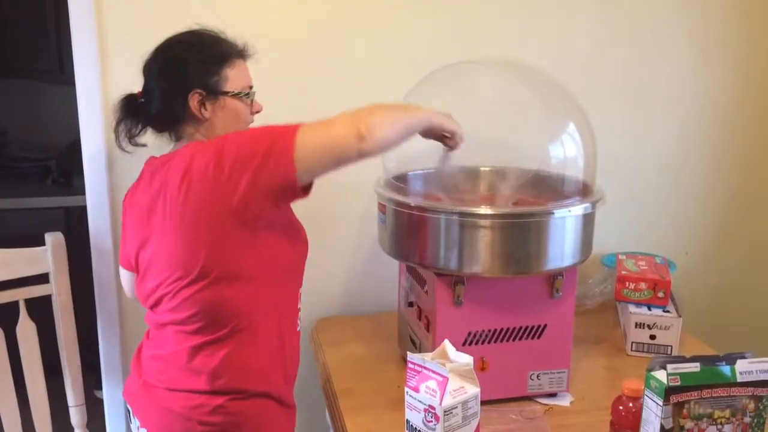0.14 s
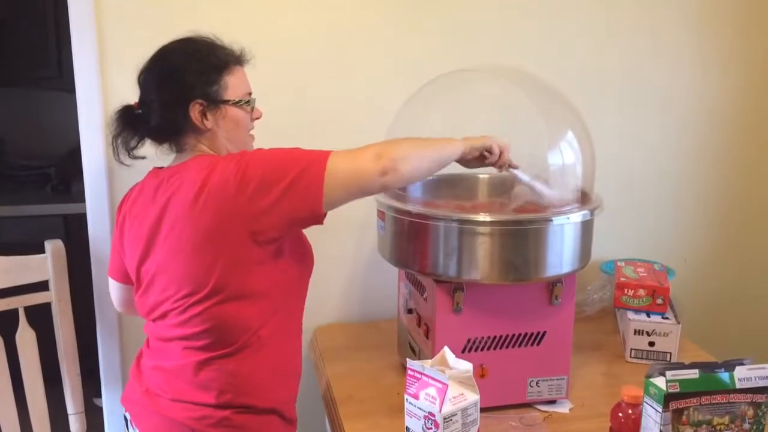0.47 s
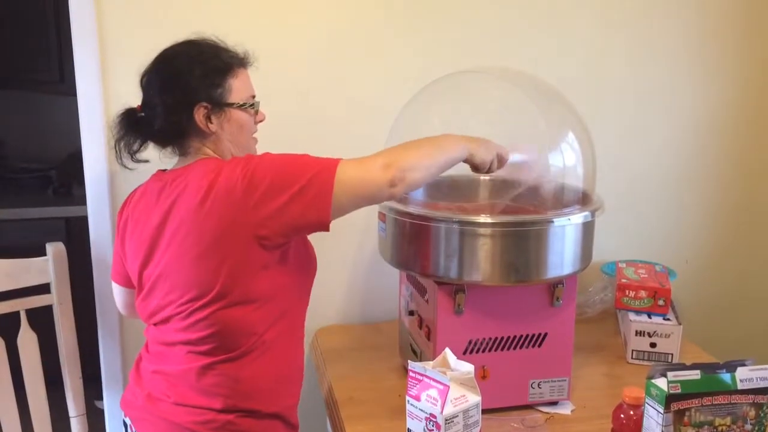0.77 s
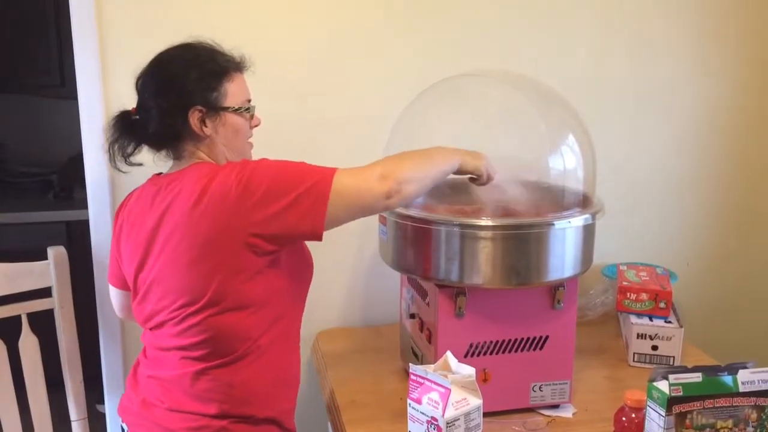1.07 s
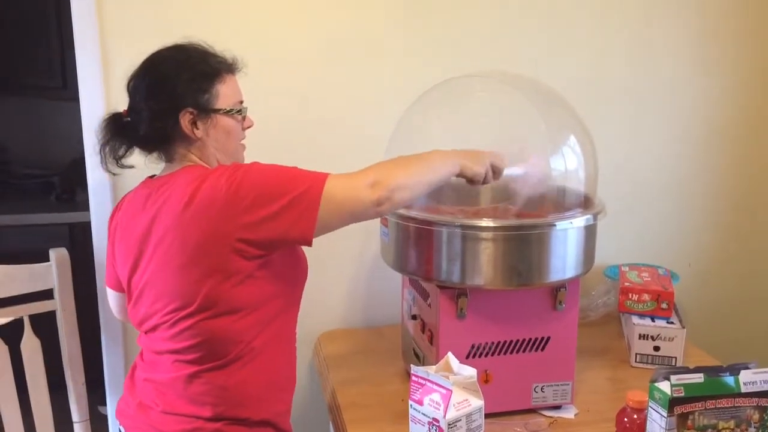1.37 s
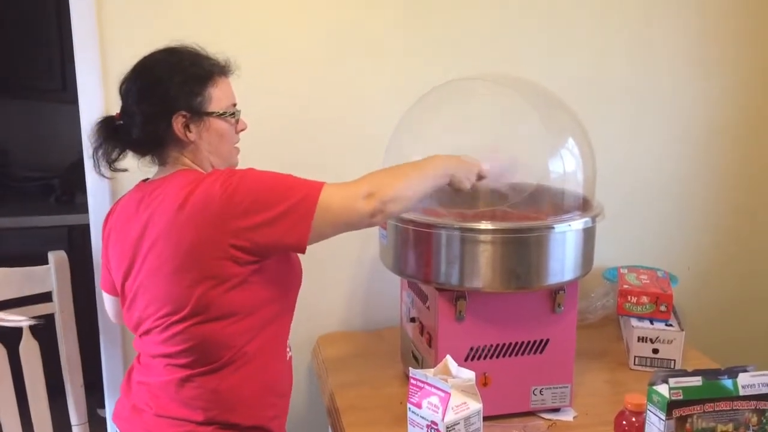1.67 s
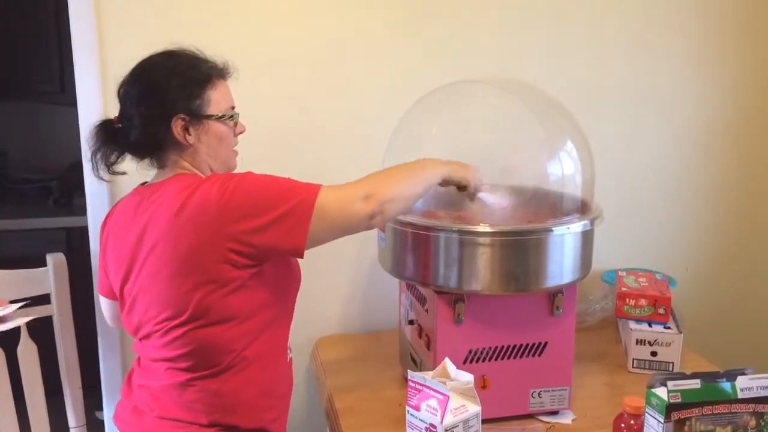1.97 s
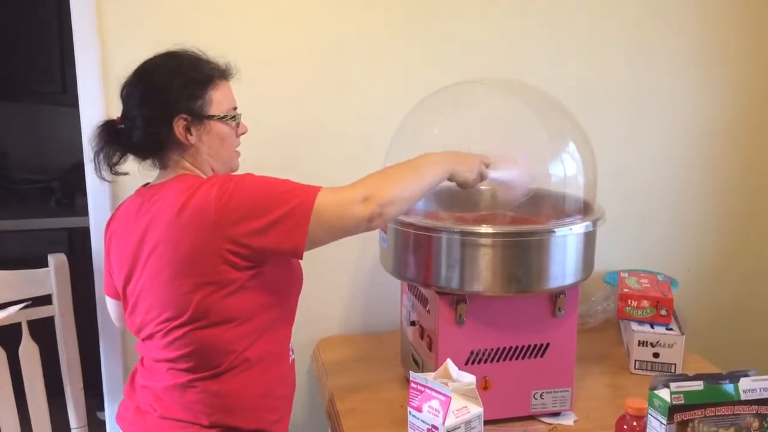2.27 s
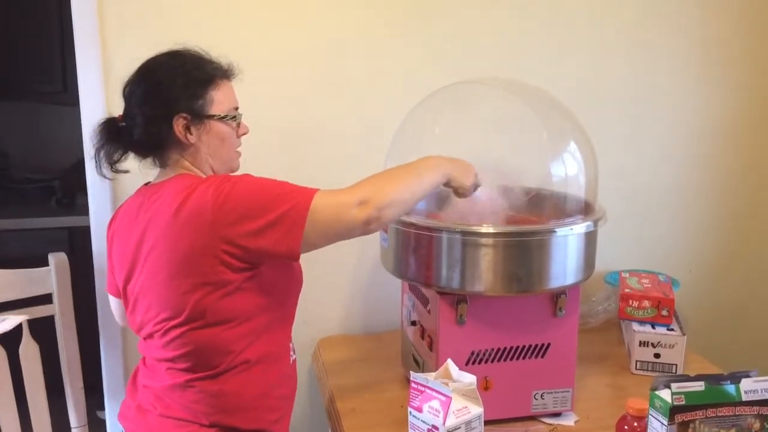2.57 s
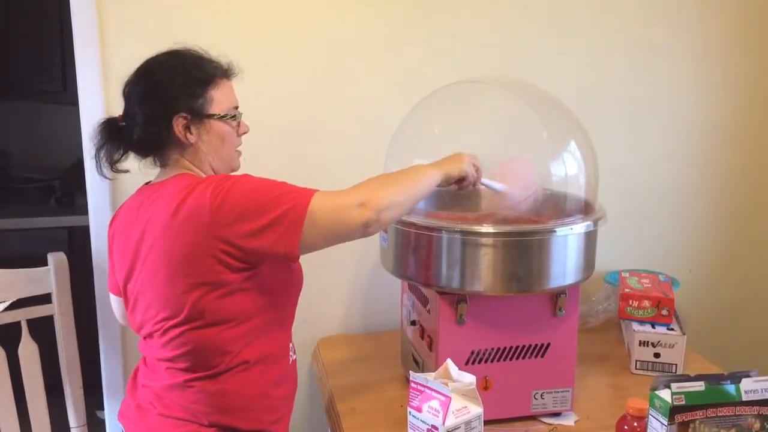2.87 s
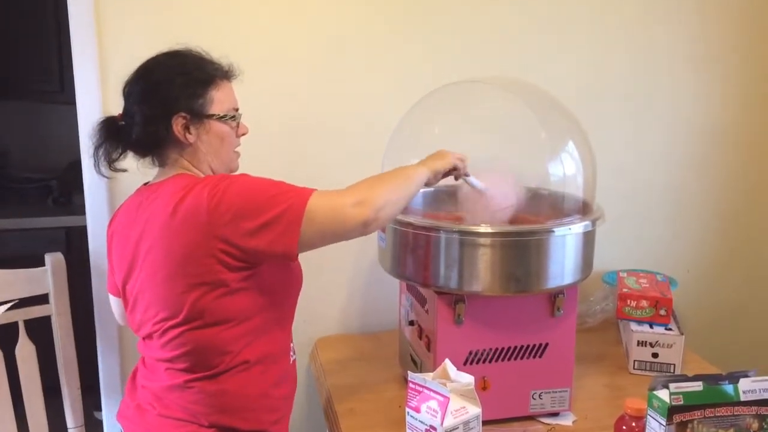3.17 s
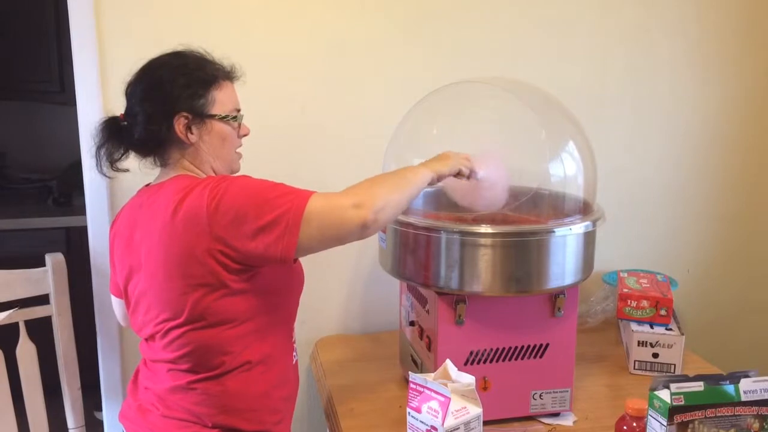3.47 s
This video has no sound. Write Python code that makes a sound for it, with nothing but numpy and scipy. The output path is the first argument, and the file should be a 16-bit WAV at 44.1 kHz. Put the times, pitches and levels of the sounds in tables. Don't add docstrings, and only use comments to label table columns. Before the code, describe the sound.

A cotton candy machine is already running and continues to the end, about 3.6 seconds: a low, boomy drone around 200 hertz, roughened by some 44 knocks per second and a slight wobble. Casing parts chatter, the steel bowl rattles, with harder clanks near 0.3, 1.25 and 1.75, and air hisses softly. A faint tap comes at 1.05, then a crisp tap cluster and short brush at 2.2. Small room, phone microphone.

```python
import sys
import numpy as np
from scipy import signal
from scipy.io import wavfile
from scipy.ndimage import uniform_filter1d

SR = 44100
rng = np.random.default_rng(int(sys.argv[2]) if len(sys.argv) > 2 else 0)


def nominal_scale(level):
    x = np.asarray(level, float) / 20
    return 10 ** x


def inscribe(sig):
    pcm = np.round(np.clip(np.atleast_2d(sig).T, -1, 1) * 32767)
    wavfile.write(sys.argv[1], SR, pcm.astype(np.int16))


N = 160524

TURNS_PER_S, START_TURN, DRIFT_TURNS = 43.5947, -.03, .006
LEAD = SR // 2
TURN = np.arange(-25, 162)
DRIFT = DRIFT_TURNS * np.sin(2 * np.pi * (TURN / 160 - .45))
WEAKER_PER_MS = .3
# (time [s], early-late swing [ms])
WOBBLE = [(0, .1), (.1, -.14), (.22, .16), (.35, 0), (.8, -.05), (1.0, .11), (1.1, -.05), (1.4, -.07),
          (1.7, .18), (1.9, -.08), (2.1, .27), (2.27, -.31), (2.6, .23), (2.8, .03), (3.03, .38),
          (3.2, .14), (3.5, .4), (3.64, .39)]

# (frequency [Hz], level [dB per Hz])
ROOM_NOISE = [(25, -28.5), (60, -16), (110, -18.5), (200, -4), (330, -17), (590, -28.5), (900, -20.5),
              (1500, -22.5)]
ROOM_DB = -38.5
MAINS_HZ, MAINS_DB = 120, -51

# (multiple of turn rate, level [dB])
BODY = [(1, -42), (2, -34.5), (3, -18.5), (4, -4.5), (5, 0.5), (6, -17.5), (7, -24.5), (8, -30), (9, -31),
        (10, -28), (11, -35), (12, -40), (13, -46)]
# (multiple of turn rate, level [dB])
DIPS = [(2.5, -44), (3.45, -20), (5.55, -12), (7.5, -46)]
# (frequency [Hz], level [dB])
TABLE_ABOVE = [(360, -56), (900, -82.5)]
PANELS_BELOW = [(200, -76), (325, -45)]
PANELS_ABOVE = [(610, -64.5), (900, -85.5)]
PANEL_FROM = 7
TABLE_ANGLE, TABLE_DB, TABLE_UNEVEN = .14, -20, .03
TABLE_SCATTER_MS, TABLE_SWAY = .07, 1.05
PANEL_ANGLE, PANEL_DB = .76, -45.5

# (angle [turns], strength [dB], share of wobble [ratio], scatter [ms], brightness [dB per octave])
TICKS = [(0.66, -3.5, 0.83, 0.027, -5), (.96, -4, 1, 0.025, 1.5), (0.1867, -8.5, 0.64, 0.1, -3)]
# (frequency [Hz], width [Hz], level [dB])
CASING = [(671, 21.2, -1.5), (689, 30.3, -0.5), (872, 71, 1), (928, 37, -4.5), (1081, 114, -3.5),
          (1246, 220, -9.5)]
CASING_BAND_HZ = [630, 3500]
TICK_DB, TICK_UNEVEN, CHATTER_DB = -42, 0.34, -48

# (frequency [Hz], width [Hz], level [dB])
BOWL = [(1471, 16, 0), (1391, 16, -4), (1513, 18, -7), (1437, 16, -9), (1558, 24, -10), (1606, 18, -13),
        (1345, 20, -9), (1940, 60, -13), (1777, 16, -13), (2090, 36, -17), (3020, 70, -22)]
# (time [s], level [dB])
RATTLE = [(0.0, -40), (0.1, -37.5), (1.34, -38), (1.6, -46), (1.64, -39.5), (2.55, -42.5), (2.64, -40),
          (3.63, -43), (3.64, -48)]
RATTLE_TRIM_DB = 0.5
# (angle [turns], decay [turns], level [dB])
SHAKES = [(.63, 0.13, -1), (.03, .12, -3)]
SHAKE_UNEVEN_DB, SHAKE_REST_DB = 3.0, -17
# (time [s], peak level [dB])
JOLTS = [
    (0.269, -20),
    (0.3374, -19.5),
    (0.613, -36),
    (0.725, -27),
    (.9555, -33),
    (1.2088, -32),
    (1.2642, -23),
    (1.736, -22),
    (2.641, -25),
    (3.0187, -27),
]
JOLT_T60, JOLT_TRIM_DB = 0.076, -2.2

# (frequency [Hz], level [dB per Hz])
AIR = [(900, -19), (1900, -1), (2600, -8.5), (3200, -8.5), (5000, -16.5), (8000, -22.5), (11000, -32.5),
       (15500, -45)]
AIR_DB = -46
# (angle [turns], width [turns], rise [dB])
GUSTS = [(.97, .08, 3.6), (.75, .04, 2.0)]

# (time [s], peak level [dB], tilt towards treble [dB per octave])
TAPS = [
    (2.1794, -25, 0),
    (2.183, -33, -6),
    (2.194, -34, -3),
    (2.199, -37, -6),
    (1.0617, -41, 3),
    (2.1755, -43, 0),
]
# (frequency [Hz], level [dB], time to fade by 60 dB [s])
DOME = [(7900, 0, .007), (4700, 0, .012), (6200, -4, .008), (10700, -10, .004), (13500, -17, .003),
        (3500, -4, .02), (2750, -7, .03)]
# (frequency [Hz], level [dB per Hz])
BRUSH = [(2000, -25), (3500, 1), (8000, -5), (10500, -9), (12000, -28)]
BRUSH_S, BRUSH_DB, BRUSH_T60 = 2.18, -45, .2

MIC_EDGE_HZ = 11500


def evened(x):
    return x / np.sqrt(np.mean(x ** 2) + 1e-20)


def curve(points, t):
    s, value = np.transpose(points)
    return np.interp(t, s, value)


def read(points, hz):
    f, value = np.transpose(points)
    return np.interp(np.log(hz + 1), np.log(f + 1), value)


def ring(x, hz, width):
    r = np.exp(-np.pi * width / SR)
    return (1 - r) * signal.lfilter([1, 0, -1], [1, -2 * r * np.cos(2 * np.pi * hz / SR), r * r], x)


def causal(points, size=32768):
    log_gain = np.log(nominal_scale(read(points, abs(np.fft.fftfreq(size, 1 / SR)))))
    return np.fft.ifft(np.exp(np.conj(signal.hilbert(log_gain)))).real[:size // 4]


def noise(points, patch_db, size=512):
    frames, hz = 4 * N // size + 5, np.fft.rfftfreq(size, 1 / SR)
    a, b, patches = rng.standard_normal((frames, len(hz), 3)).T
    patches = uniform_filter1d(patches, size=8, axis=0)
    patches = evened(uniform_filter1d(patches, size=6000 // size + 1, axis=1))
    z = (a + 1j * b) * nominal_scale(read(points, hz)[:, None] + patch_db * patches)
    return evened(signal.istft(z, nperseg=size, noverlap=3 * size // 4)[1][:N])


def knocks(angle, share, scatter_ms, uneven):
    s = (TURN + angle - START_TURN - DRIFT) / TURNS_PER_S
    luck = rng.standard_normal((len(TURN), 2))
    late_ms = share * curve(WOBBLE, s) * (-1.) ** TURN
    s = s + 1e-3 * (late_ms + scatter_ms * luck[:, 0])
    size = 1 + uneven * luck[:, 1] - WEAKER_PER_MS * late_ms
    at = s * SR + LEAD
    keep = at > 0
    size, at = size[keep], at[keep]
    whole, part = at.astype(int), at % 1
    out = np.zeros(N + 2 * SR)
    out[whole], out[whole + 1] = size * (1 - part), size * part
    return out[:N + LEAD]


def burst(angle, decay):
    turns = np.arange(N) / SR * TURNS_PER_S + START_TURN - angle
    return np.exp(-(turns % 1) / decay), np.floor(turns).astype(int) + 2


def softened(x):
    return signal.sosfilt(signal.butter(2, CASING_BAND_HZ[1], fs=SR, output="sos"), x)


def room():
    return nominal_scale(ROOM_DB) * noise(ROOM_NOISE + [(2500, -53)], patch_db=3.0, size=2048)


def hum():
    return nominal_scale(MAINS_DB) * np.sqrt(2) * np.sin(2 * np.pi * MAINS_HZ * np.arange(N) / SR)


def boom():
    body = [(k * TURNS_PER_S, db) for k, db in BODY]
    dips = [(k * TURNS_PER_S, db) for k, db in DIPS]
    table = sorted(body[:PANEL_FROM] + dips) + TABLE_ABOVE
    panels = PANELS_BELOW + body[PANEL_FROM:] + PANELS_ABOVE
    low = knocks(TABLE_ANGLE, share=TABLE_SWAY, scatter_ms=TABLE_SCATTER_MS, uneven=TABLE_UNEVEN)
    high = knocks(PANEL_ANGLE, share=0.61, scatter_ms=0.055, uneven=0.14)
    out = 0
    for db, train, part in [(TABLE_DB, low, table), (PANEL_DB, high, panels)]:
        boomed = signal.oaconvolve(train, causal(part))[LEAD:LEAD + N]
        out = out + nominal_scale(db) * evened(boomed)
    return out


def ticks():
    trains = []
    for angle, db, share, scatter_ms, tilt_db in TICKS:
        trains.append((knocks(angle, share, scatter_ms, TICK_UNEVEN)[LEAD:], db, tilt_db))
    chatter = 0.34 + burst(0.98, 0.9)[0] + 0.2 * burst(1.0, 0.25)[0]
    chatter = chatter * rng.standard_normal(N)
    struck, shaken = 0, 0
    for hz, width, mode_db in CASING:
        train = sum(nominal_scale(db + tilt_db * np.log2(hz / 860)) * x for x, db, tilt_db in trains)
        struck = struck + nominal_scale(mode_db) * ring(ring(train, hz, width), hz, 3 * width)
        shaken = shaken + nominal_scale(mode_db) * ring(ring(chatter, hz, 4.3 * width), hz, 3 * width)
    both = nominal_scale(TICK_DB) * evened(struck) + nominal_scale(CHATTER_DB) * evened(shaken)
    edge = signal.butter(5, CASING_BAND_HZ[0], "high", fs=SR, output="sos")
    return signal.sosfilt(edge, softened(both))


def bowl():
    drive = nominal_scale(SHAKE_REST_DB) * np.ones(N)
    for angle, decay, db in SHAKES:
        bump, turn = burst(angle, decay)
        uneven_db = SHAKE_UNEVEN_DB * rng.standard_normal(len(TURN))[turn]
        drive = drive + bump * nominal_scale(db + uneven_db)
    drive = drive * rng.standard_normal(N)
    rung = 0
    for hz, width, db in BOWL:
        rung = rung + nominal_scale(db) * evened(ring(ring(drive, hz, width), hz, 6 * width))
    out = evened(rung) * nominal_scale(curve(RATTLE, np.arange(N) / SR) + RATTLE_TRIM_DB)
    t = np.arange(6000) / SR
    for s, peak_db in JOLTS:
        jolt = sum(nominal_scale(db) * np.sin(2 * np.pi * (hz * t + rng.uniform(-0.2, .15))) for hz, _, db in BOWL)
        jolt = jolt * np.minimum(t / 0.0019, 1) * nominal_scale(-60 * t / JOLT_T60)
        start = round(s * SR)
        out[start:][:len(t)] += nominal_scale(peak_db + JOLT_TRIM_DB) * (jolt / abs(jolt).max())[:N - start]
    return softened(out)


def air():
    turns = np.arange(N) / SR * TURNS_PER_S + START_TURN + .5
    puff_db = 0
    for angle, width, db in GUSTS:
        away = (turns - angle) % 1 - .5
        puff_db = puff_db + db * np.exp(-.5 * (away / width) ** 2)
    return nominal_scale(AIR_DB) * evened(noise(AIR, patch_db=0.88) * nominal_scale(puff_db))


def taps():
    t, out = np.arange(4000) / SR, np.zeros(N)
    for s, peak_db, tilt_db in TAPS:
        tick = 0
        for hz, db, t60 in DOME:
            fade = nominal_scale(db + tilt_db * np.log2(hz) - 60 * t / t60)
            tick = tick + fade * np.sin(2 * np.pi * hz * rng.uniform(.97, 1.03) * t)
        out[round(s * SR):][:len(t)] += nominal_scale(peak_db) * tick / abs(tick).max()
    since = np.arange(N) / SR - BRUSH_S
    fade = np.clip(since / .004, 0, 1) * nominal_scale(BRUSH_DB - 60 * np.maximum(since, 0) / BRUSH_T60)
    return out + noise(BRUSH, patch_db=3.0) * fade


def scene():
    return (room() + hum() + boom() + ticks() + bowl() + air() + taps())[None]


def top_cut(x):
    return signal.sosfilt(signal.butter(12, 15310, fs=SR, output="sos"), x)


def record(dry):
    heard = signal.sosfilt(signal.butter(2, MIC_EDGE_HZ, fs=SR, output="sos"), dry)
    return top_cut(heard)


dry = scene()
out = record(dry)
inscribe(out)
```